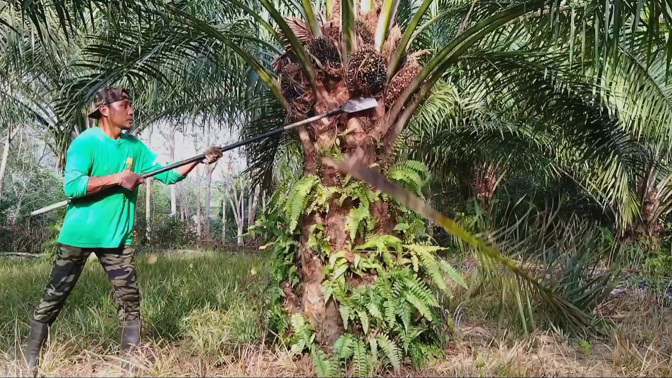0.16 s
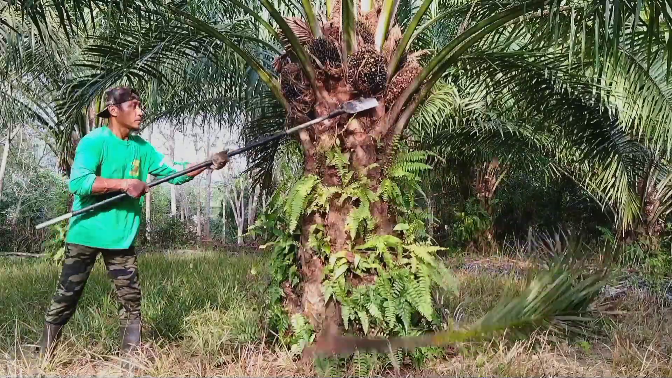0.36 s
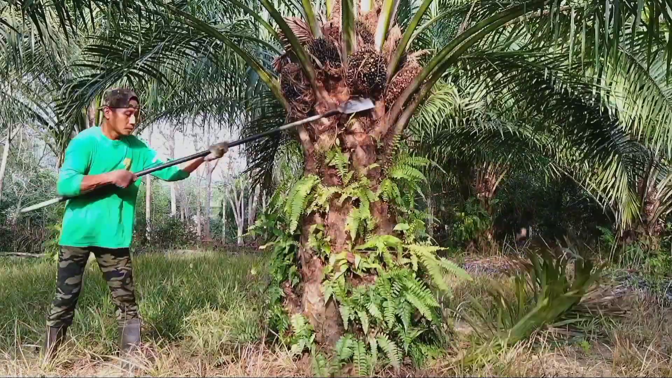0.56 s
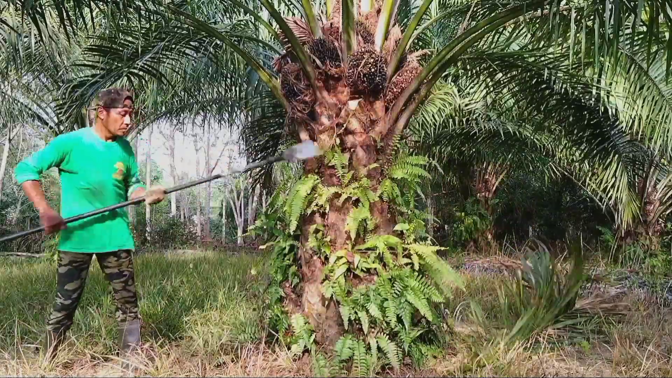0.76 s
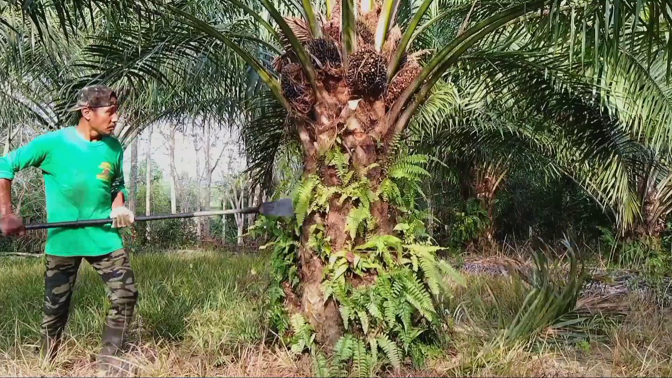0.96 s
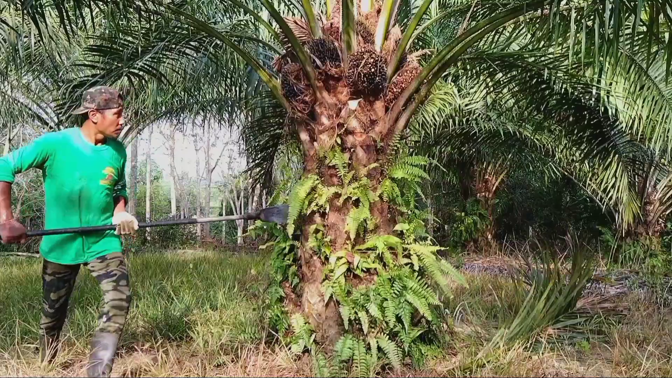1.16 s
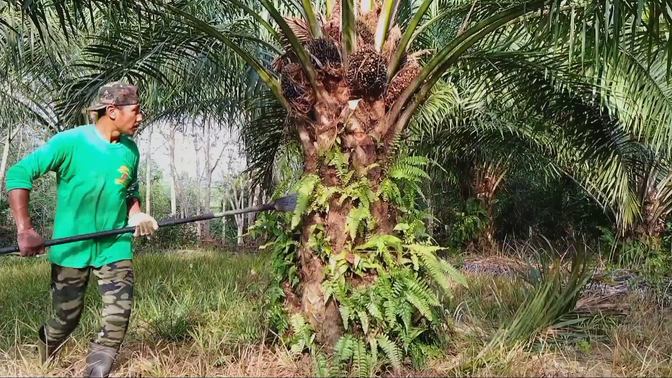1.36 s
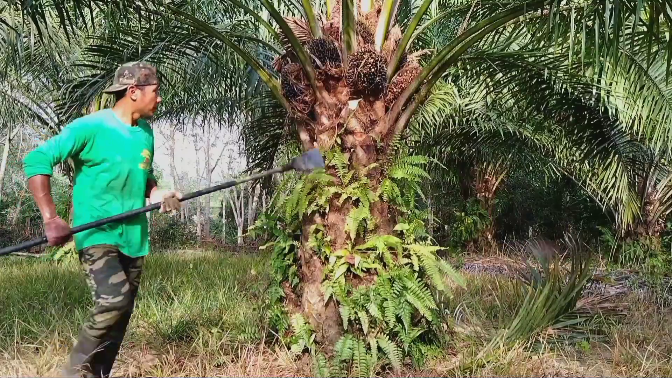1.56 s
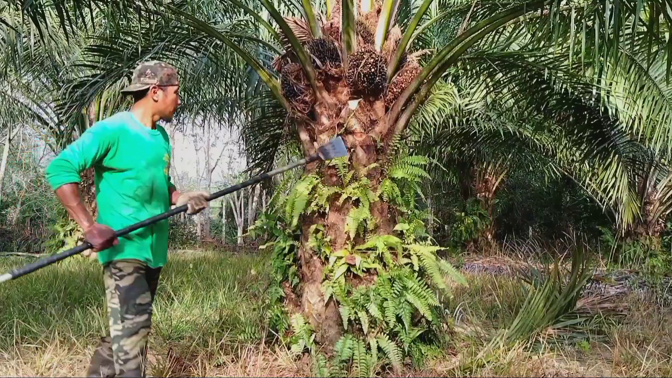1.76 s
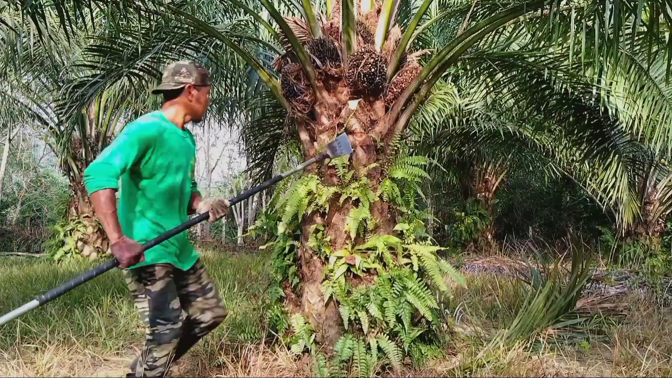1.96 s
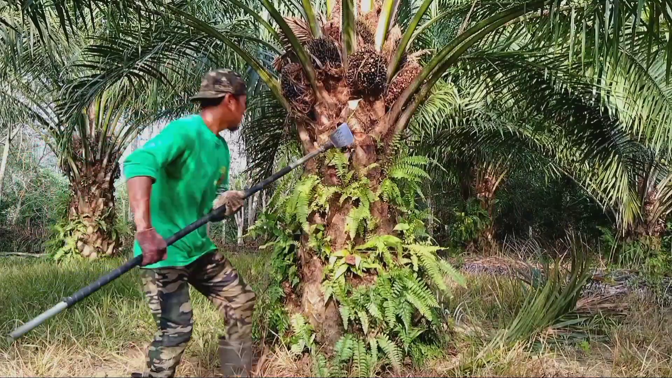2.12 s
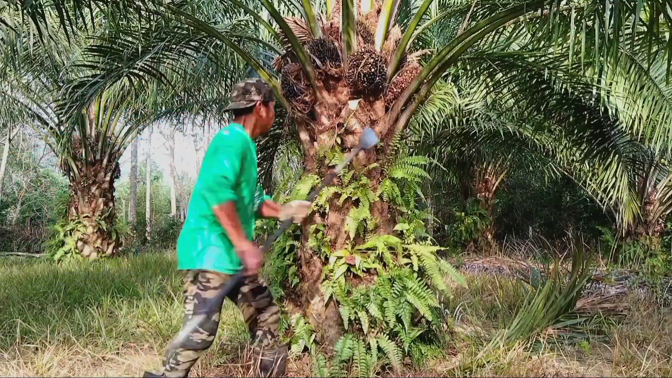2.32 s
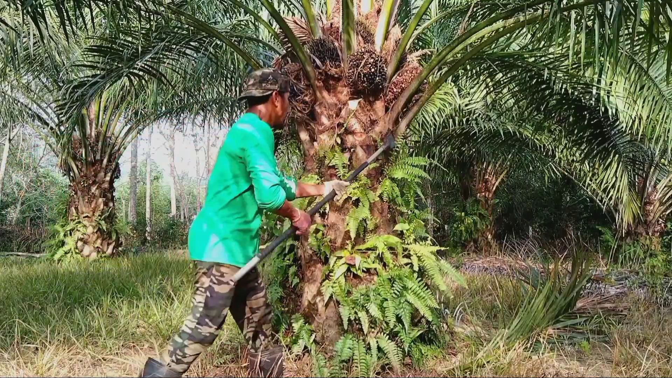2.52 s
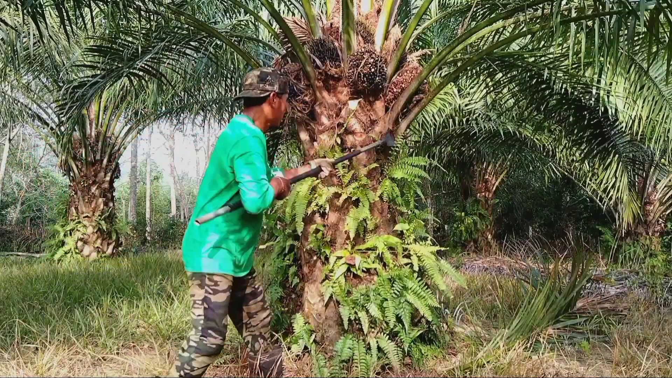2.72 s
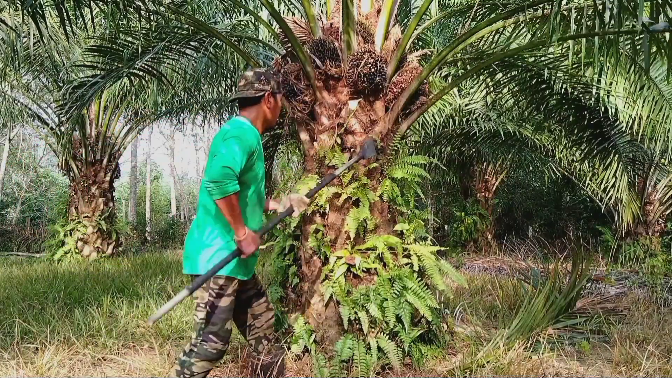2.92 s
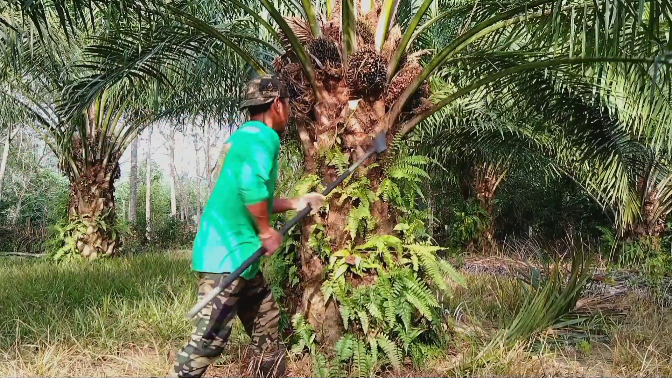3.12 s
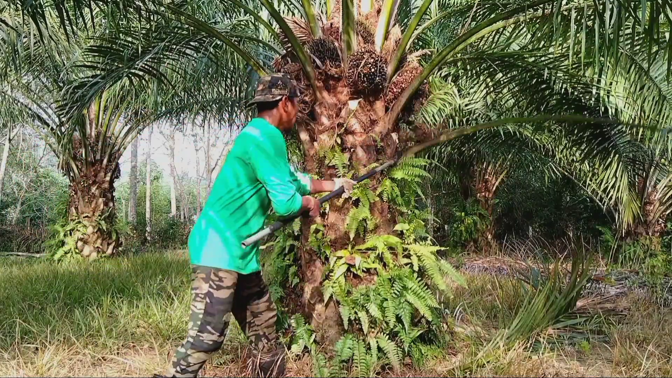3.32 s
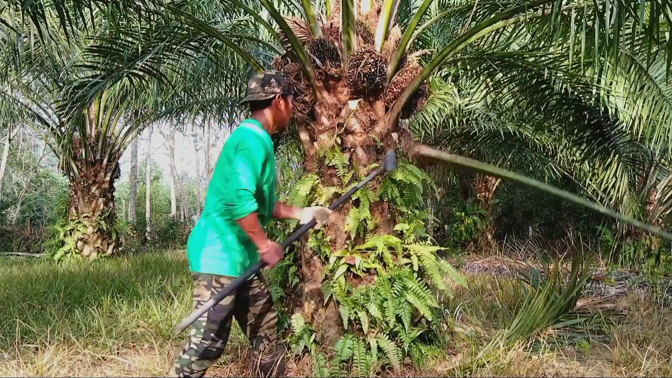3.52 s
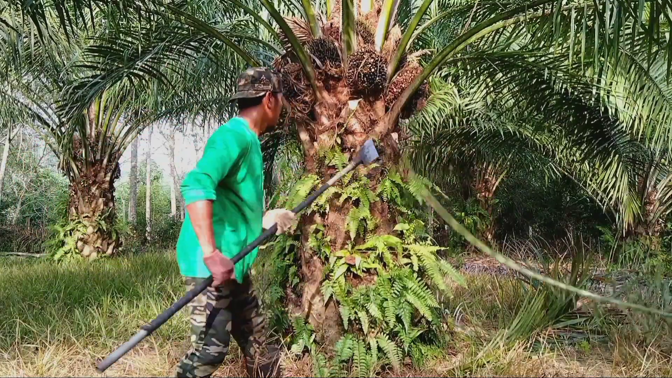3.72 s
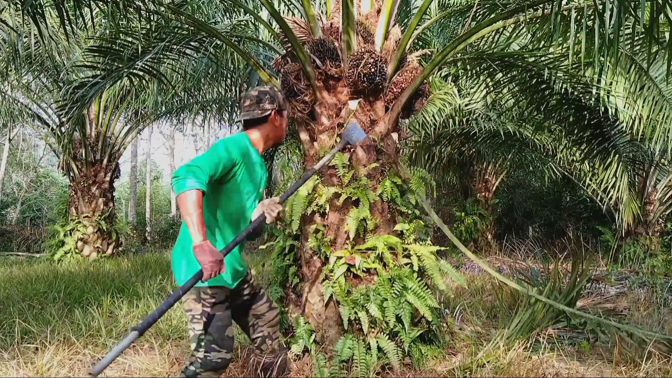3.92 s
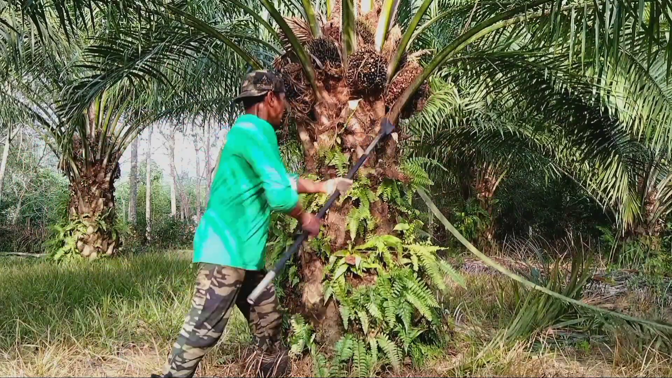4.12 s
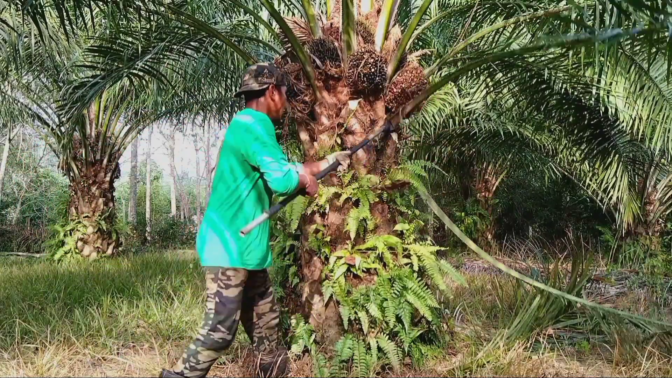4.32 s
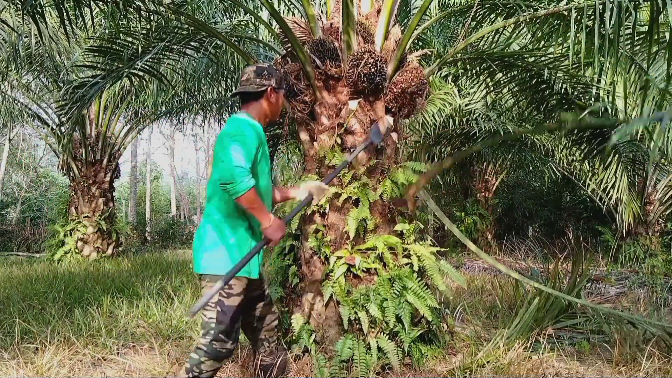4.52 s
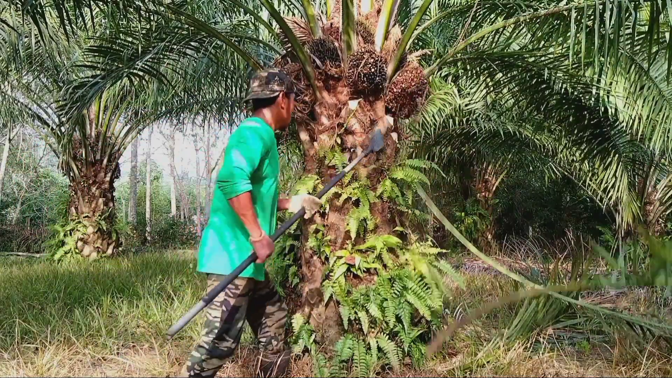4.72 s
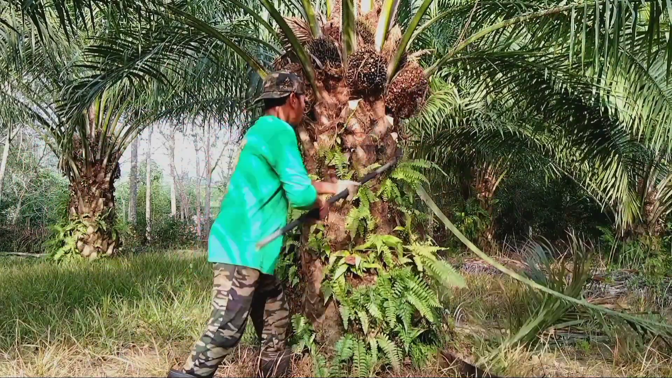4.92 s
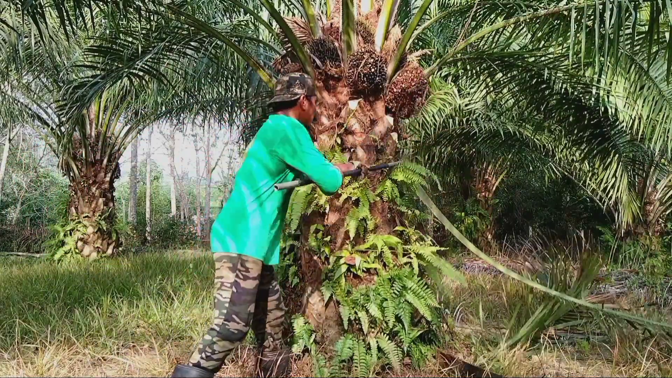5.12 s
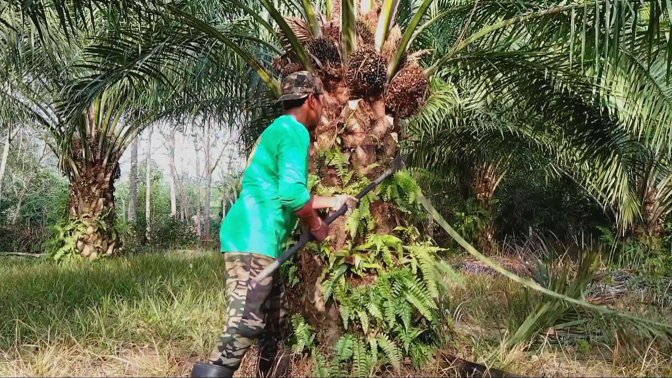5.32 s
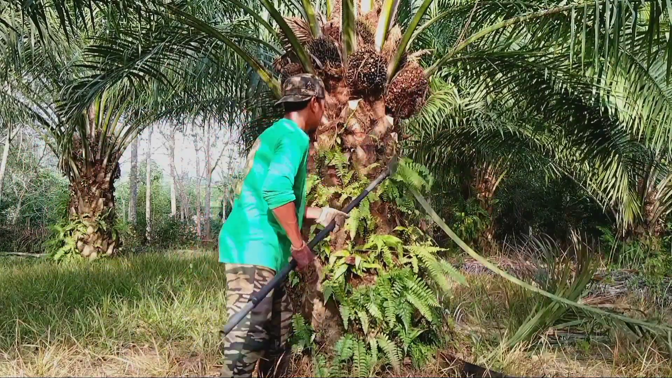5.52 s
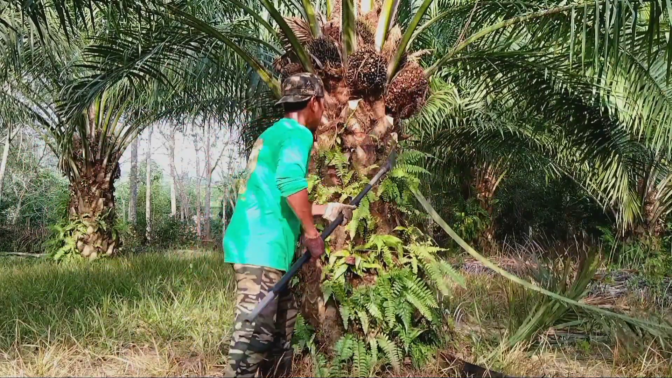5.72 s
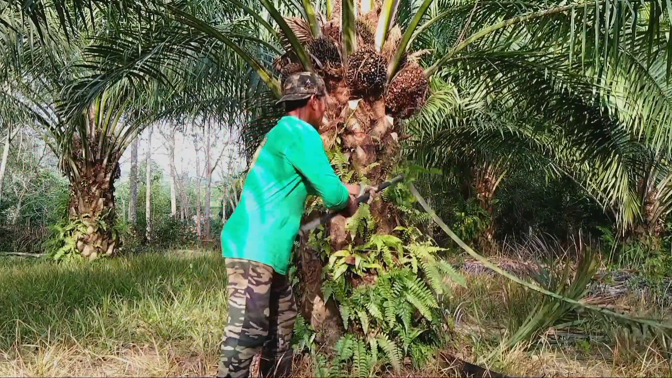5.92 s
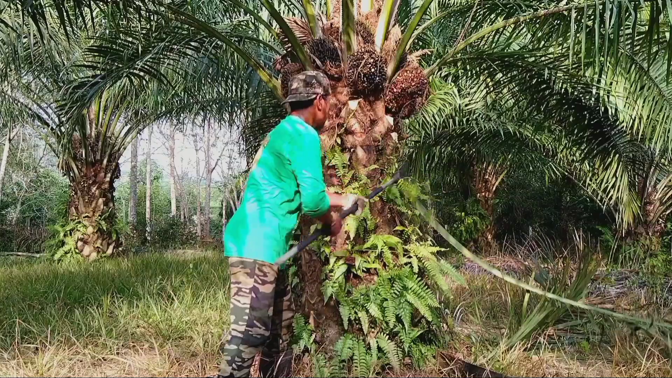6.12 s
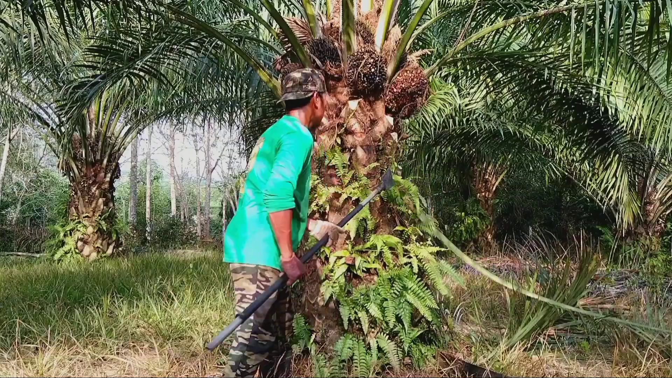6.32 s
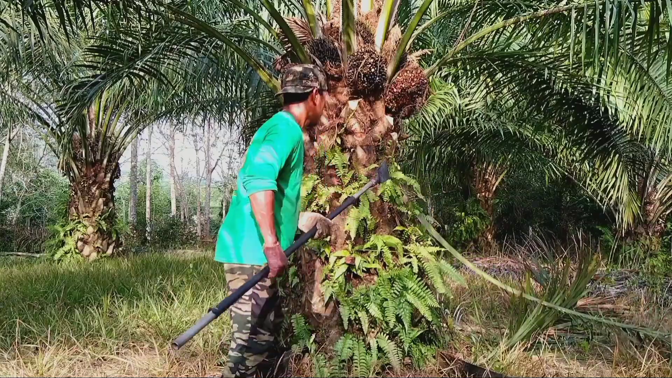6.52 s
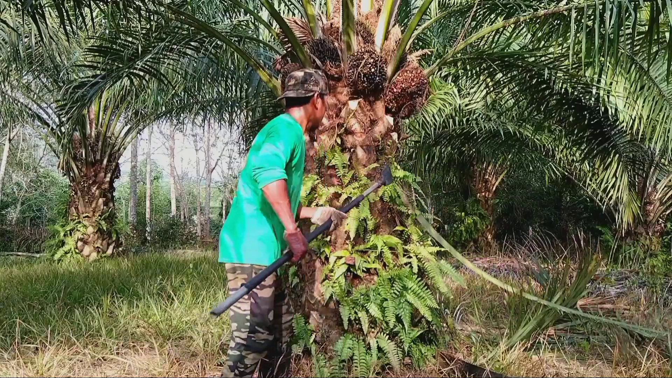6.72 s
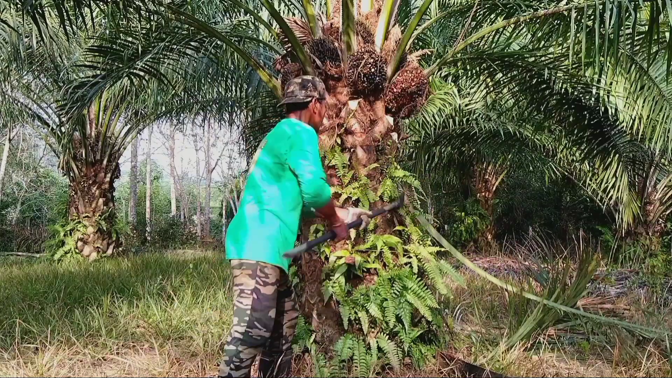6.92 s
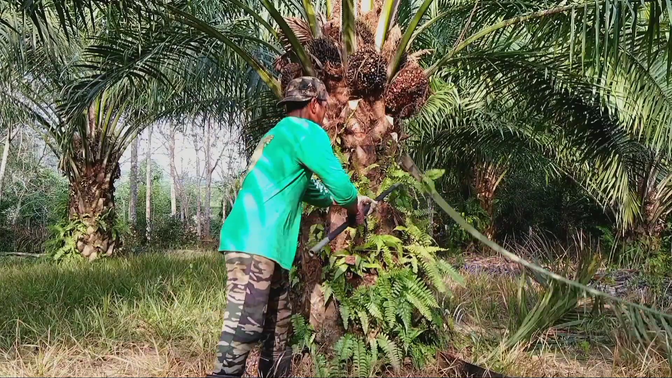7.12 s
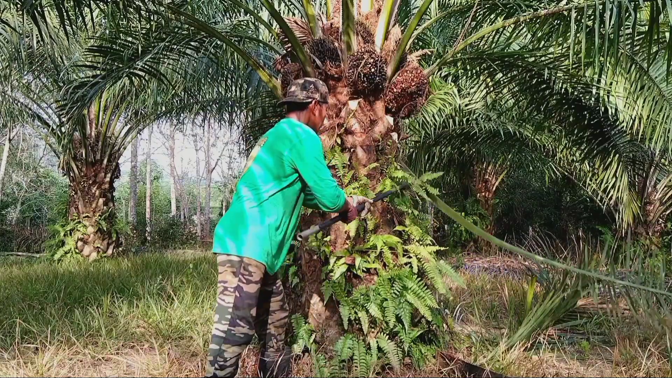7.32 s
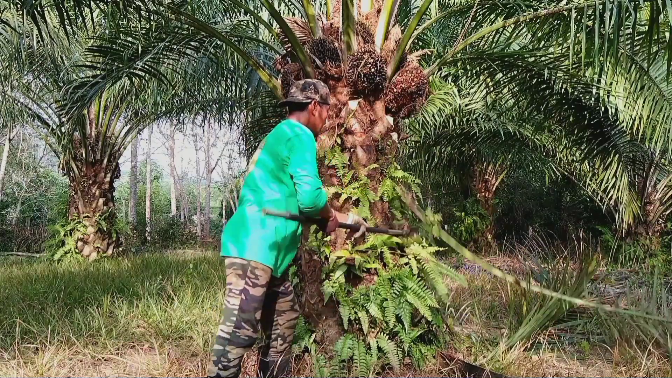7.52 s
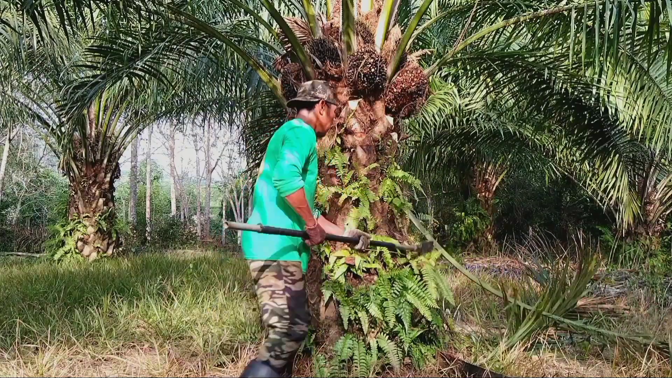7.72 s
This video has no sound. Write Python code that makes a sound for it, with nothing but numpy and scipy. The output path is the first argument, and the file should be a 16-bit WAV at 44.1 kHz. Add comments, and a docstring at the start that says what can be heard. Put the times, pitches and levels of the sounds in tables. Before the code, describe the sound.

A blade on a pole bites a palm stalk at once with a loud woody knock and rip, then clacks against stubs as the frond swishes and bumps down. Soft boots brush grass. Three more hard chops follow unevenly, with strands snapping and leaves trembling; later come heavy frond bumps, a leafy spatter, a faint steel ring and a light final cut. Quiet open grove, small microphone with thin bass and a faint echo.

```python
"""Cutting oil-palm fronds with a pole chisel

Outdoors, a chisel on a long pole is driven through stalks: four hard thrusts and a light one, each a modal knock
and trunk boom, with ripping made of filtered random fractures and a tremble of the leaves' noise.
Strands snap and creak, fronds swish as shaped noise and bump down, leaflets spatter; boots brush and thud.
The blade clacks and rings in steel modes, a bird sings gliding sines, and a faint noise tail echoes it all but the leaves.
"""
import sys
import numpy as np
from scipy import signal
from scipy.fft import rfft, irfft
from scipy.io import wavfile
from scipy.ndimage import uniform_filter1d

SR = 44100
rng = np.random.default_rng(int(sys.argv[2]) if len(sys.argv) > 2 else 0)


def pcm_store(signal):
    """Save signal as 16-bit PCM."""
    levels = np.round(np.clip(np.atleast_2d(signal), -1, 1) * 32767)
    wavfile.write(sys.argv[1], SR, levels.astype(np.int16).T)


N = 341819
T = np.arange(N) / SR
AGE = T[:SR // 2]  # time since the start of a short event, s

# the blade meets a stalk: (time [s], knock level [dB], stalk pitch [Hz], trunk boom level [dB],
# tearing level [dB], cut length [s], tearing tilt [dB/octave], shaken leaf level [dB])
THRUSTS = [(.085, -12, 480, -33, -18, 0.067, 2.7, -52.5), (2.615, -15.5, 454, -29, -18.5, 0.051, 0.5, -50),
           (3.422, -21, 602, -41, -18.5, 0.1, 1.9, -50),
           (4.356, -12, 499.6, -31.5, -17.5, .078, 0.6, -47.5),
           (7.193, -37, 710, -41.5, -31, 0.047, 1.5, -52)]
# a boot swings through grass and lands:
# (landing time [s], thud level [dB], thud length [s], thud pitch [Hz], swing before landing [s])
STEPS = [(0.973, -44.5, 0.0028, 320, 0.064), (1.446, -49, .022, 277, 0.11), (1.771, -50, 0.014, 370, 0.22),
         (2.004, -32, 0.0044, 290, 0.16), (2.09, -48, 0.0071, 298.7, .01), (2.468, -42, 0.014, 231, 0.39),
         (5.651, -40, .014, 228, 0.11), (5.708, -53.5, .012, 260, 0.012)]
# spectrum of breaking strands: (frequency [Hz], density [dB/Hz])
STRAND_SPECTRUM = [(150, -26.5), (380, 1.5), (1450, 2), (3500, -2), (4900, -16.5), (7000, -7), (11000, -24),
                   (15500, -22.5)]
# spectrum of leaves: (frequency [Hz], density [dB/Hz])
LEAF_SPECTRUM = [(150, -23), (300, -5.5), (700, 0.5), (1450, 1.5), (3700, -3), (4600, -5.5), (7300, -3),
                 (10500, -13), (15000, -11)]


def amp(db):
    """Decibels to gain."""
    return 10 ** (np.asarray(db) / 20)


def unit(x):
    """Scales to rms 1."""
    return x / np.sqrt(np.mean(x ** 2) + 1e-20)


def read(points, hz):
    """Interpolates a table on a log-frequency axis."""
    table_hz, value = np.transpose(points)
    return np.interp(np.log(hz + 1), np.log(table_hz), value)


def add(mix, start_s, sound):
    """Mixes a sound in at a given time."""
    part = mix[max(round(start_s * SR), 0):][:len(sound)]
    part += sound[:len(part)]


def colour(x, spectrum, tilt_db=0):
    """Filters by a spectrum, tilted in dB per octave above 100 Hz, and scales to rms 1."""
    hz = np.fft.rfftfreq(len(x), 1 / SR)
    gain_db = read(spectrum, hz) + tilt_db * np.log2(np.maximum(hz, 100))
    return unit(irfft(rfft(x) * amp(gain_db), len(x)))


def crackle(size, per_s, spread_db):
    """Tiny fractures at random moments; a positive spread makes a few much larger, a negative one smaller."""
    count = int(per_s * size / SR) + 1
    signs = rng.choice([-1, 1], count)
    sizes = signs * amp(spread_db * np.minimum(rng.exponential(1, count), 4))
    places = rng.integers(0, size, count)
    return unit(np.bincount(places, sizes, size))


def grains(size, per_s, spread_db, q):
    """Fibres of many thicknesses: each pitch rings to its own crackle; thin, high ones are the most numerous."""
    pitches_hz = np.geomspace(250, 15000, num=32) * rng.uniform(.95, 1.05, size=32)
    rates = per_s * np.maximum(pitches_hz / 1000, 1) ** 1.5
    out = np.zeros(size)
    for hz, rate in zip(pitches_hz, rates):
        b, a = signal.iirpeak(hz, q, fs=SR)
        out += signal.lfilter(b, a, crackle(size, rate, spread_db))
    return out


def motion():
    """Leaf and drag gains over time: trembling leaves, moving fronds and swinging boots add in power."""
    # a frond falls or is shoved: (time [s], rustle level [dB], low drag level [dB],
    # time in motion [s], settling rate [dB/s])
    frond_moves = [(0.628, -44, -48, 0.11, 36), (3.645, -42, -56.5, 0.46, 29), (4.993, -38, -46, 0.27, 60),
                   (6.028, -44.5, -56, 0.2, 35), (6.779, -58.5, -71.5, 0.028, 103),
                   (7.12, -53.5, -68.5, 0.083, 60), (7.18, -45, -53, 0.19, 30), (7.711, -45, -58, .04, 38)]
    rise_s, stop_s = .04, 0.052
    braking_db_per_s = -6.5  # its neighbours brake it on the way
    settle_db, settle_s = -3.5, 1  # settling starts softer; the last leaflet is still after settle_s
    shake_s, shake_drag_db = 1.32, -10  # duration of the tremble; low sway relative to the leaves
    swing_db, swing_drag_db, swing_rise_s, swing_stop_s = -60, -61.5, 0.067, 0.078

    moves = [(np.ones(N), -79, -87.5)]  # at rest: (shape, leaves dB, drag dB)
    for s, *_, shake_db in THRUSTS:
        tremble = np.interp(T, [s, s + rise_s, s + shake_s], [0, 1, 0])
        moves.append((tremble, shake_db, shake_db + shake_drag_db))
    for s, db, drag_db, length_s, settle_db_per_s in frond_moves:
        moving_s = np.clip(T - s, 0, length_s)
        rest_s = np.maximum(T - s - length_s, 0)
        slide = np.clip((T - s) / rise_s, 0, 1) * amp(braking_db_per_s * moving_s)
        settle = amp(settle_db - settle_db_per_s * rest_s)
        settle = settle * np.maximum(1 - (rest_s / settle_s) ** 2, 0)
        stop = np.exp(-rest_s / stop_s)
        moves.append((slide * np.maximum(stop, settle), db, drag_db))
    for s, *_, swing_s in STEPS:
        rise = np.clip((T - s + swing_s) / swing_rise_s, 0, 1)
        brush = rise * np.exp(-np.maximum(T - s, 0) / swing_stop_s)
        moves.append((brush, swing_db, swing_drag_db))
    leaf_power = sum((amp(db) * shape) ** 2 for shape, db, _ in moves)
    drag_power = sum((amp(drag_db) * shape) ** 2 for shape, _, drag_db in moves)
    return np.sqrt(leaf_power), np.sqrt(drag_power)


def rustle(patchy_db=1.5):
    """Leaflets rub as noise, catch in pitched grains and tick; stalks drag as low noise underneath."""
    # spectrum of the low drag: (frequency [Hz], density [dB/Hz])
    drag_spectrum = [(30, -23.5), (115, 0), (200, -3), (400, -5), (1500, -29.5)]
    flutter_db = patchy_db * np.interp(T, np.linspace(0, T[-1], 700), rng.standard_normal(700))
    rub = colour(rng.standard_normal(N), LEAF_SPECTRUM)
    leaflets = colour(grains(N, per_s=45, spread_db=3.8, q=12), LEAF_SPECTRUM)
    ticks = colour(crackle(N, per_s=110, spread_db=5.5), LEAF_SPECTRUM)
    leaves = .56 * rub + .75 * leaflets + .36 * ticks
    drag = colour(rng.standard_normal(N), drag_spectrum)
    leaf_gain, drag_gain = motion()
    return leaves * leaf_gain * amp(flutter_db) + drag * drag_gain


def burst(grain, db, length_s, rise_s, fall_s):
    """A force builds, holds while the material gives way, and dies out; db is the level at full force."""
    force = np.minimum(AGE / rise_s, 1) * np.exp(-np.maximum(AGE - length_s, 0) / fall_s)
    return amp(db) * unit(grain * force) * np.sqrt(np.mean(force ** 2))


def ring(hz, db, t60_s):
    """One struck mode: a sine that decays exponentially."""
    return amp(db - 60 * AGE / t60_s) * np.sin(2 * np.pi * hz * AGE)


def woody(x, dry_db, detune):
    """Stalk resonances, at slightly different pitches for each break, colour a sound at unchanged rms."""
    # resonances of the cut stalk: (nominal frequency [Hz], width [Hz], level [dB])
    resonances = [(1066, 20, 6.5), (1290, 140, -2.5), (1440, 220, 4), (1720, 27, -1), (2400, 210, 3)]
    out = amp(dry_db) * x
    for nominal_hz, width_hz, db in resonances:
        hz = nominal_hz * (1 + detune * rng.uniform(-0.91, 1))
        b, a = signal.iirpeak(hz, hz / width_hz, fs=SR)
        out = out + amp(db) * signal.lfilter(b, a, x)
    return unit(out) * np.sqrt(np.mean(x ** 2))


def chops(lurch_db=2.0, bundles=4):
    """Stalk and trunk modes knock while the edge catches and slips, ripping bundle after bundle of fibres."""
    # stalk modes: (multiple of stalk pitch [ratio], level re knock [dB], t60 [s])
    stalk_modes = [(.69, -9.5, .08), (1, 3.5, 0.055), (1.31, -5.5, .06), (2.08, -12, 0.094)]
    # trunk modes: (frequency [Hz], level re boom [dB], t60 [s])
    trunk_modes = [(127, 0.5, 0.18), (182, -3, 0.22)]
    # spectrum of tearing fibres: (frequency [Hz], density [dB/Hz])
    fibre_spectrum = [(100, -19.5), (270, -14.5), (450, 4), (660, 6.5), (800, -6.5), (1050, 0),
                      (3600, -2.5), (5000, -12), (7000, -8.5), (11000, -22), (15500, -22.5)]
    knock_lag_s = .003  # the stalk answers just after the bite
    slowing_db, dulling_db_per_octave = -3.5, -.5  # change per bundle as the blade slows
    ripping_share = 0.66  # of the time per bundle, at full force

    out = np.zeros(N)
    for s, knock_db, stalk_hz, boom_db, tear_db, cut_s, tilt_db, _ in THRUSTS:
        knock = sum(ring(stalk_hz * ratio, knock_db + db, t60_s) for ratio, db, t60_s in stalk_modes)
        boom = sum(ring(hz, boom_db + db, t60_s) for hz, db, t60_s in trunk_modes)
        add(out, s + knock_lag_s, (knock + boom) * (1 - np.exp(-AGE / .003)))
        bundle_s = cut_s / bundles
        for k in range(bundles):
            wander = unit(uniform_filter1d(rng.standard_normal(len(AGE)), size=130))  # about 3 ms
            lurch = amp(lurch_db * wander)
            breaks = grains(len(AGE), per_s=500, spread_db=2.5, q=12)
            fibres = lurch * colour(breaks, fibre_spectrum, tilt_db + k * dulling_db_per_octave)
            rip = burst(fibres, tear_db + k * slowing_db, ripping_share * bundle_s, rise_s=.003, fall_s=0.0069)
            add(out, s + k * bundle_s, woody(rip, dry_db=4.5, detune=0.076))
    return out


def crack(db, length_s, tilt_db):
    """Woody fibre gives way: dense fractures, strongest at the onset, coloured by the stalk."""
    splinters = colour(crackle(len(AGE), per_s=12000, spread_db=1.5), STRAND_SPECTRUM, tilt_db)
    splinters = splinters * (1 + amp(-2.5) * np.exp(-AGE / 0.0011))
    return woody(burst(splinters, db, length_s, rise_s=0.0001, fall_s=0.0029), dry_db=5, detune=0.061)


def clacks(length_s=0.0049, tilt_db=-3.5):
    """The blade jolts against woody stubs, and once a boot's toe taps down after its heel: short, dull cracks
    of one length and tilt."""
    # blade against stub, or a boot's toe after its heel: (time [s], level [dB])
    clack_events = [(.213, -38.5), (.256, -29.5), (.266, -32), (0.292, -29.5), (.302, -30.5), (.312, -34.5),
                    (.336, -27), (.354, -31.5), (.385, -37), (.721, -31), (.75, -34), (0.763, -32),
                    (1.099, -52), (1.2, -55), (1.772, -52.5), (1.981, -44.5), (2.723, -36.5), (2.767, -40),
                    (6.251, -42.5)]
    out = np.zeros(N)
    for s, db in clack_events:
        add(out, s, crack(db, length_s, tilt_db))
    return out


def thud(db, length_s, hz, below_db=12, above_db=10, push=0.79):
    """Soft earth hardly rings: a short low push plus a noise scuff that falls away around its pitch."""
    # below_db and above_db: slopes of roughly so many dB per octave
    hump = [(hz / 8, -3 * below_db), (hz / 1.2, 0), (hz * 1.2, 0), (hz * 32, -5 * above_db)]
    scuff = colour(rng.standard_normal(len(AGE)), hump)
    blow = push * ring(hz, 14.4, t60_s=9 / hz) + scuff
    return burst(blow, db, length_s, rise_s=0.0048, fall_s=0.0077)


def bumps(crack_lag_s=.003, crack_db=-17, crack_tilt_db=-2.5):
    """Heavy stalks thud on the earth and their dry skin cracks, crack_db relative to the thud."""
    # stalk meets earth: (time [s], level [dB], length [s], pitch [Hz])
    bump_events = [(0.657, -33, 0.0068, 315), (0.765, -33.5, 0.0075, 437), (5.005, -34, 0.0099, 169),
                   (5.143, -34, 0.043, 530), (6.072, -33.5, 0.019, 550), (6.111, -34.5, 0.027, 500),
                   (6.13, -34, 0.024, 159), (6.25, -35, 0.0091, 460), (7.51, -51, .02, 166)]
    out = np.zeros(N)
    for s, db, length_s, hz in bump_events:
        add(out, s, thud(db, length_s, hz))
        add(out, s + crack_lag_s, crack(db + crack_db, length_s, crack_tilt_db))
    return out


def slaps():
    """Stiff leaflets hit the ground in a bright spatter of dense fractures."""
    # leaflets land: (time [s], level [dB], length [s])
    slap_events = [(0.658, -38, 0.057), (5.052, -36.5, 0.007), (5.157, -28.5, 0.024),
                   (5.188, -28.5, 0.0055)]
    out = np.zeros(N)
    for s, db, length_s in slap_events:
        spatter = colour(crackle(len(AGE), per_s=5500, spread_db=-1.0), LEAF_SPECTRUM, tilt_db=1.5)
        add(out, s, burst(spatter, db, length_s, rise_s=0.0025, fall_s=0.023))
    return out


def blade(touch_db=7.0):
    """A light touch, a noise burst touch_db above the ping level, sets the steel modes ringing."""
    # blade grazes something: (time [s], level [dB], t60 [s])
    ping_events = [(.887, -49, 0.32), (5.195, -43, 0.25), (5.543, -47, 0.22)]
    # steel modes: (frequency [Hz], level re ping [dB])
    steel_modes = [(1585, -5), (1910, 1), (2160, -15), (3951, -6), (6476, -14), (6815, -1), (10955, -11),
                   (14520, -15)]
    out = np.zeros(N)
    for s, db, t60_s in ping_events:
        scrape = colour(rng.standard_normal(len(AGE)), STRAND_SPECTRUM)
        touch = burst(scrape, db + touch_db, length_s=0.0044, rise_s=0.0019, fall_s=0.0043)
        add(out, s, touch + sum(ring(hz, db + mode_db, t60_s) for hz, mode_db in steel_modes))
    return out


def boots():
    """Boots land on soft earth with a thud."""
    out = np.zeros(N)
    for s, db, length_s, hz, _ in STEPS:
        add(out, s, thud(db, length_s, hz))
    return out


def bird():
    """Sine notes that slide ever faster, made husky by pitch jitter."""
    # bird notes: (time [s], peak level [dB], length [s], start pitch [Hz], end pitch [Hz])
    notes = [(2.917, -40.5, 0.028, 1154, 1680), (5.893, -63, 0.037, 1710, 1510),
             (6.476, -49.5, 0.051, 1960, 1690), (6.645, -50, 0.048, 1600, 1390),
             (6.698, -52, 0.045, 1434, 1200)]
    out = np.zeros(N)
    for s, db, length_s, start_hz, end_hz in notes:
        u = np.linspace(0, 1, round(length_s * SR))
        glide_hz = start_hz + (end_hz - start_hz) * u ** 1.7
        jitter = .35 * uniform_filter1d(rng.standard_normal(len(u)), size=60)
        phase = 2 * np.pi * np.cumsum(glide_hz * (1 + jitter)) / SR
        add(out, s, amp(db) * np.sin(np.pi * u) * np.sin(phase))
    return out


def snaps(length_at_30_s=0.0033, growth_per_db=0.21):
    """Single strands snap under the frond's weight; thicker ones are louder and splinter for longer."""
    # strands and dry stems snap: (time [s], level [dB], tilt [dB/octave])
    snap_events = [(2.975, -30, 2), (3.057, -39.5, 2.5), (3.146, -33.5, -.5), (3.204, -43.5, 2),
                   (3.252, -34.5, 4), (3.266, -35.5, -1.5), (3.298, -28.5, 1.5), (3.309, -27.5, 0.5),
                   (3.538, -29, -3), (3.781, -32.5, 4.5), (4.012, -35.5, -1), (4.506, -31.5, 3),
                   (4.617, -37, 7.5), (5.008, -36, 4.5), (6.081, -32.5, 5), (6.159, -31.5, 5),
                   (6.794, -41.5, 2.5)]
    out = np.zeros(N)
    for s, db, tilt_db in snap_events:
        length_s = length_at_30_s * np.exp(growth_per_db * (db + 30))  # reference level -30 dB
        add(out, s, crack(db, length_s, tilt_db))
    return out


def creak(start_s=3.315, length_s=.105, db=-46, start_hz=170, end_hz=300):
    """The sagging frond twists on its last strands: uneven slips quicken and fade to half amplitude."""
    slip_hz = np.linspace(start_hz, end_hz, round(length_s * SR))
    uneven_hz = slip_hz * (1 + .8 * rng.standard_normal(len(slip_hz)))
    turns = np.cumsum(uneven_hz) / SR
    slips = np.diff(np.floor(np.maximum.accumulate(turns)), prepend=0)  # one impulse per turn
    strands = woody(colour(slips, STRAND_SPECTRUM, tilt_db=-2), dry_db=0, detune=.03)
    out = np.zeros(N)
    add(out, start_s, amp(db) * strands * np.linspace(1, .5, len(slips)))
    return out


def grove(x, wet_db=-15):
    """A faint tail lingers after every sound: convolution with noise decaying per frequency."""
    # decay of the tail: (frequency [Hz], t60 [s])
    decay = [(100, 1), (600, 0.29), (14000, 0.55)]
    hz, t, z = signal.stft(rng.standard_normal(SR), SR, nperseg=256)
    decay_db = -60 * t / read(decay, hz)[:, None]
    tail = signal.istft(z * amp(decay_db), SR, nperseg=256)[1][:SR]
    tail = tail * np.minimum(T[:SR] / 0.013, 1)
    return amp(wet_db) * signal.fftconvolve(x, tail / np.linalg.norm(tail))[:N]


def scene():
    """Work among the palms and a bird farther off, which feeds the tail at twice its direct gain."""
    leaves = rustle()
    work = chops() + clacks() + bumps() + slaps() + blade() + boots() + snaps() + creak()
    song = bird()
    return (work + song + grove(work + 2 * song) + leaves)[None]


def record(dry, low_cut_hz=65, edge_hz=15750):
    """A small microphone without deep bass, then a steep low-pass band limit."""
    thin = signal.lfilter(*signal.butter(2, low_cut_hz, "high", fs=SR), dry)
    band_limit = signal.firwin(511, edge_hz, window=("kaiser", 9), fs=SR)
    return signal.oaconvolve(thin, band_limit[None], "same")


dry = scene()
out = record(dry)
pcm_store(out)
```